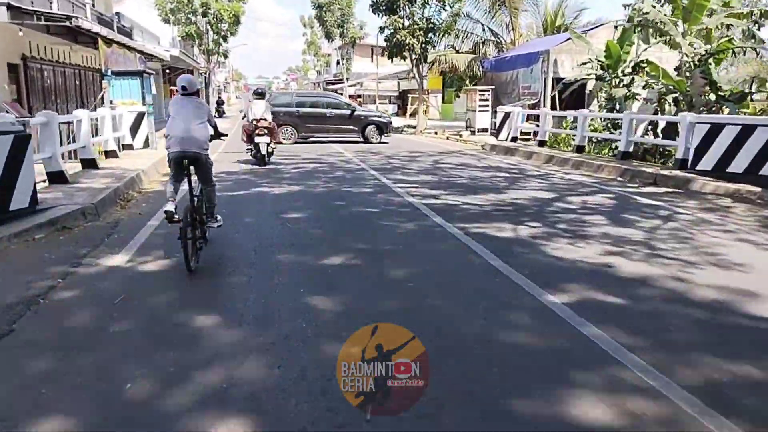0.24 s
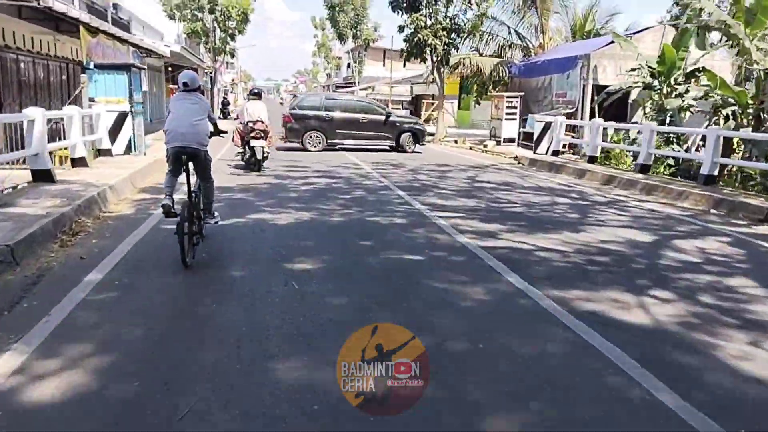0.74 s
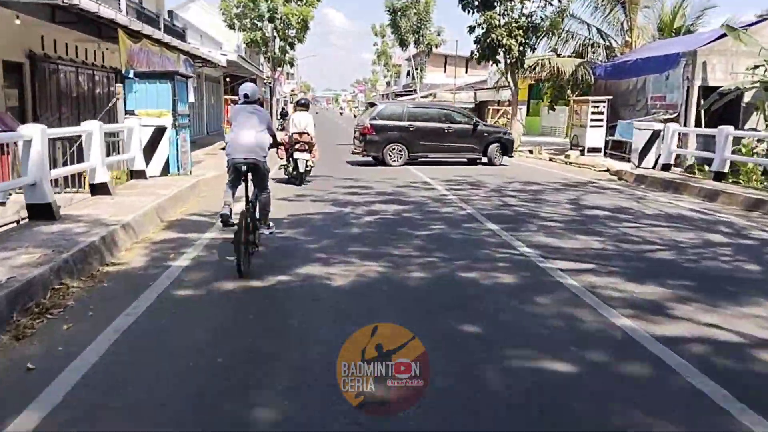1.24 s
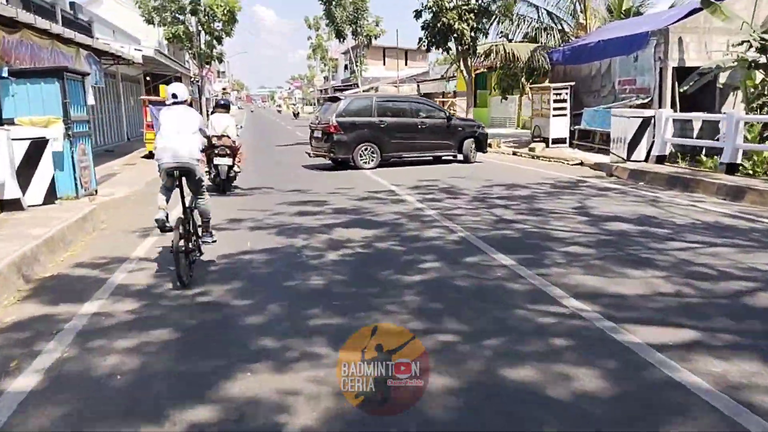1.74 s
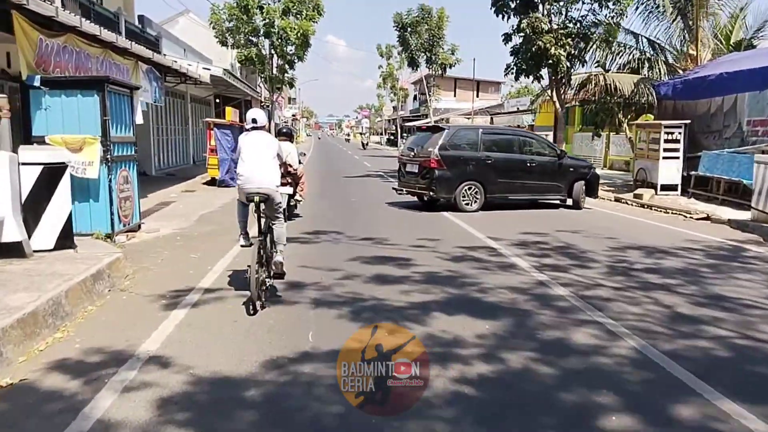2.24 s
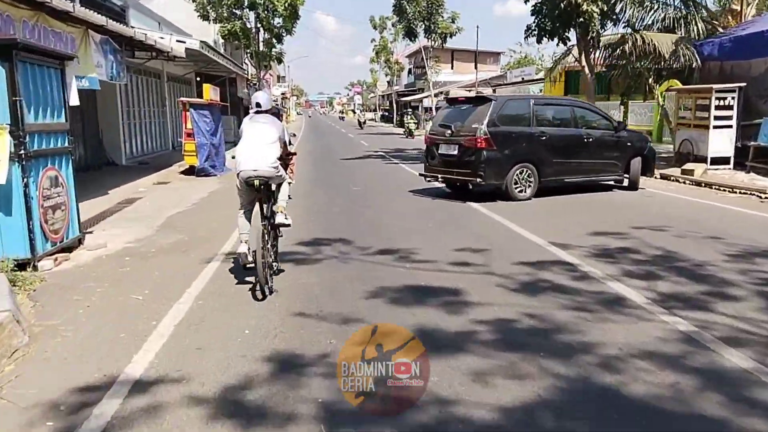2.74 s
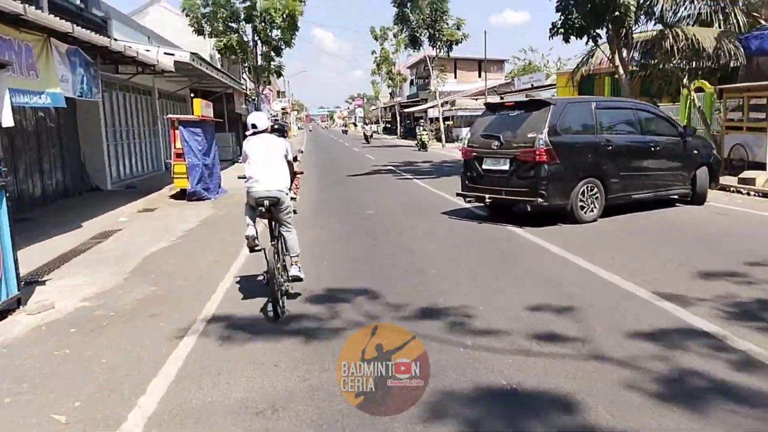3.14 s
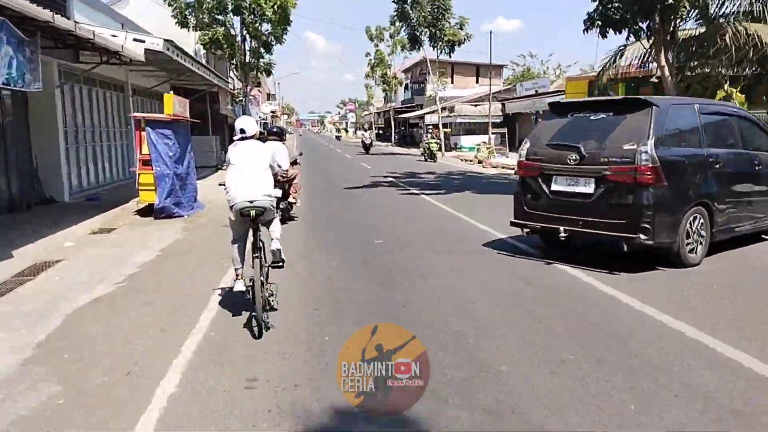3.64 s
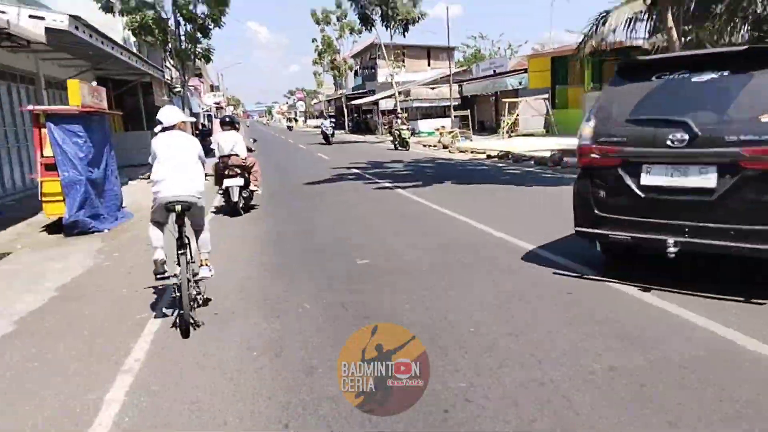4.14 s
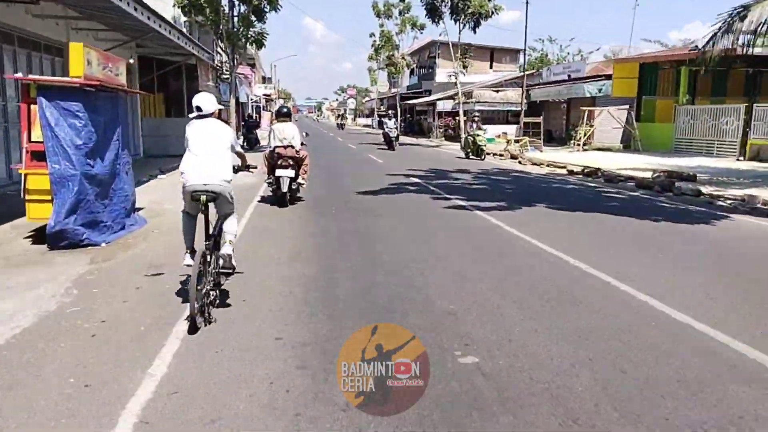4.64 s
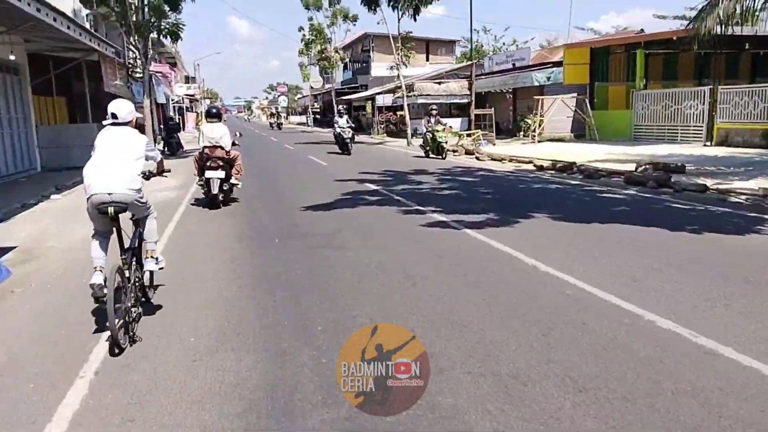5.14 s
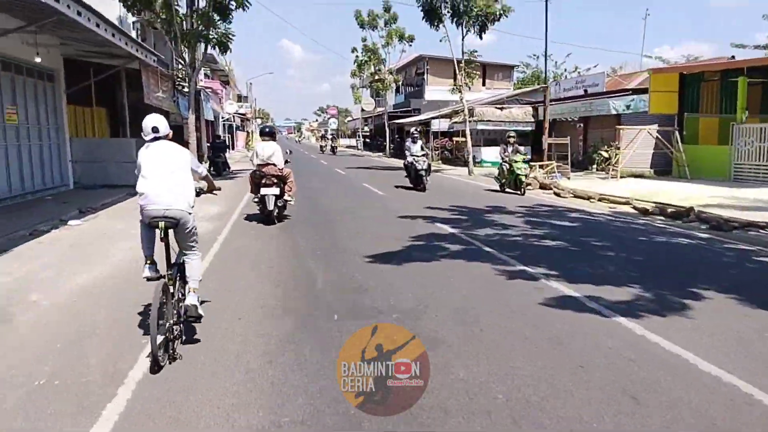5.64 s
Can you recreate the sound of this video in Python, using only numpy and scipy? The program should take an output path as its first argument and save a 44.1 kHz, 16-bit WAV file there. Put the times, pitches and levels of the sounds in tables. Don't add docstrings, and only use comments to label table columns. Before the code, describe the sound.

A motorbike whooshes past in buffeting wind, then a small bicycle bell is flicked seven times close by, ringing brightly over faint street traffic.

```python
import sys
import numpy as np
from scipy import signal
from scipy.io import wavfile
from scipy.ndimage import uniform_filter1d

SR = 44100
rng = np.random.default_rng(int(sys.argv[2]) if len(sys.argv) > 2 else 0)


def undo_db(level):
    steps = np.asarray(level, float) / 20
    return 10 ** steps


def store_wav(level_fs):
    pcm = np.round(np.clip(np.atleast_2d(level_fs), -1, 1) * 32767)
    wavfile.write(sys.argv[1], SR, pcm.T.astype(np.int16))


N = 260631


def evened(x):
    return x / np.sqrt(np.mean(x ** 2) + 1e-20)


def read(points, hz):
    f, value = np.transpose(points)
    return np.interp(np.log(hz + 1), np.log(f + 1), value, left=-90, right=-90)


def along(rows, column):
    rows = np.asarray(rows)
    return np.interp(np.arange(N) / SR, rows[:, 0], rows[:, column])


def add(mix, s, sound):
    part = mix[round(s * SR):][:len(sound)]
    part += sound[:len(part)]


def slow(hz):
    low_pass = signal.butter(2, hz, fs=SR, output="sos")
    return evened(signal.sosfiltfilt(low_pass, rng.standard_normal(N)))


def noise(colour, size, patch_db, patch_hz, patch_s):
    hop = size // 4
    frames, hz = N // hop + 5, np.fft.rfftfreq(size, 1 / SR)
    a, b, patches = rng.standard_normal((frames, len(hz), 3)).T
    patches = uniform_filter1d(patches, max(1, round(patch_hz * size / SR)), 0)
    patches = evened(uniform_filter1d(patches, max(1, round(patch_s * SR / hop)), 1))
    z = (a + 1j * b) * undo_db(read(colour, hz)[:, None] + patch_db * patches)
    return evened(signal.istft(z, nperseg=size, noverlap=size - hop)[1][:N])


def resonate(x, hz, width):
    turn = np.exp(2j * np.pi * np.cumsum(hz * np.ones(len(x))) / SR)
    r = np.exp(-np.pi * width / SR)
    return 2 * (turn * signal.lfilter([1 - r], [1, -r], x / turn)).real


def narrow(x, hz, width):
    return evened(resonate(resonate(x, hz, width), hz, width))


def band(x, order, edges_hz):
    return evened(signal.sosfilt(signal.butter(order, edges_hz, "band", fs=SR, output="sos"), x))


def steadied(x, size):
    return evened(x / (uniform_filter1d(x ** 2, size) + .02 * np.mean(x ** 2)) ** .22)


# (time [s], level [dB], share of road grit [dB])
MOTORBIKE = [
    (0, -51.5, -67),
    (.3, -46.5, -64),
    (.4, -40, -68),
    (.67, -38, -62.5),
    (.85, -47, -63.5),
    (1.0, -53.5, -68),
    (1.1, -59, -73),
    (1.3, -80.5, -93.5),
]
# (frequency [Hz], level [dB per Hz])
EXHAUST = [(290, -73.5), (500, -26), (728, -7.5), (794, -1.5), (1120, -1.5), (1220, 3), (1670, -4),
           (1980, -5.5), (2400, -14), (3340, -19.5), (5000, -22.5), (6500, -36.5), (11000, -120)]


def motorbike():
    wash = noise(EXHAUST, size=1024, patch_db=3, patch_hz=120, patch_s=0.06)
    gone = np.clip((1.5 - np.arange(N) / SR) / .3, 0, 1)
    return undo_db(along(MOTORBIKE, column=1) - 8.5) * wash * gone


# (time [s], level [dB])
BREEZE = [(0, -58), (.3, -49), (.7, -49), (1.05, -44), (1.4, -50), (1.75, -54), (2.1, -63), (2.8, -68),
          (3.15, -57), (3.55, -44), (3.85, -49), (4.2, -52), (4.55, -50), (4.9, -46), (5.25, -46),
          (5.6, -53), (5.91, -53)]
# (peak time [s], length [s], buffet level [dB], low flutter below it [dB], high flap below it [dB])
GUSTS = [(0.135, 0.046, -39, -38, -34), (0.35, 0.085, -34, -6, -19), (0.5, 0.075, -36, -11, -27),
         (0.763, 0.059, -37, -30, -37), (0.838, 0.05, -35, -19, -47), (0.929, 0.066, -35, -16, -41),
         (1.01, 0.078, -35, -10, -36), (1.149, 0.048, -33, -18, -37), (1.233, 0.05, -40, -13, -36),
         (1.319, 0.046, -40, -26, -36), (1.531, 0.095, -37, -25, -34), (1.602, 0.094, -42, -19, -31),
         (1.701, 0.105, -44, -20, -31), (1.881, 0.058, -47, -27, -22), (2.174, 0.059, -36, -19, -44),
         (2.252, 0.05, -44, -19, -5), (2.906, 0.044, -49, -20, -16), (3.065, 0.046, -42, -18, -10),
         (3.27, 0.091, -43, -14, -13), (3.446, 0.055, -31, -19, -27), (3.522, 0.053, -32, -12, -27),
         (3.755, 0.11, -38, -9, -13), (3.921, 0.044, -35, -28, -26), (3.98, 0.055, -40, -23, -27),
         (4.144, 0.043, -35, -16, -17), (4.349, 0.095, -42, -10, -22), (4.407, 0.063, -43, -19, -20),
         (4.495, 0.107, -42, -17, -14), (4.648, 0.097, -38, -7, -16), (4.78, 0.054, -33, -15, -21),
         (4.877, 0.086, -27, -7, -9), (5.01, 0.054, -43, -5, -13), (5.1, 0.055, -37, -15, -22),
         (5.175, 0.046, -32, -18, -22), (5.259, 0.06, -37, -9, -27), (5.361, 0.062, -36, -11, -11),
         (5.51, 0.064, -40, -22, -26), (5.561, 0.051, -40, -26, -32), (5.655, 0.085, -45, -8, -8),
         (5.811, 0.045, -44, -13, -16)]
GUST_HZ = [123, 142, 149, 126, 134, 143, 150, 144, 128, 120, 116, 119, 135, 111, 122, 112, 140, 151, 149,
           138, 137, 155, 141, 134, 131, 160, 142, 154, 137, 122, 141, 134, 142, 154, 126, 145, 123, 149,
           151, 149]
# (frequency [Hz], level [dB per Hz])
BUFFET = [(12, -70), (20, -44), (43, -32), (91, -2), (113, 0), (184, -4), (264, -23), (300, -31),
          (357, -26), (400, -24), (520, -54), (880, -120)]


def wind():
    t = np.arange(N) / SR
    lumps = undo_db(1.7 * slow(hz=18))
    low = noise(BUFFET, size=2048, patch_db=1.0, patch_hz=40, patch_s=0.013)
    pitch = np.interp(t, np.transpose(GUSTS)[0], GUST_HZ) + 6 * slow(hz=10)
    throb = steadied(resonate(low, pitch, 45), size=600)
    buffet = evened(lumps * (throb + .45 * low))
    flutter = noise([(190, -26.5), (225, -6), (290, -11), (350, -34)],
                    size=2048, patch_db=1.5, patch_hz=40, patch_s=0.044)
    flap = noise([(290, -45.0), (330, 3.5), (480, -3.5), (620, -18.5)],
                 size=2048, patch_db=1.0, patch_hz=60, patch_s=0.035)
    push = undo_db(along(BREEZE, column=1) + np.array([[0], [-27], [-34]]))
    for s, length, db, flutter_db, flap_db in GUSTS:
        length = 1.2 * length
        near = slice(max(round((s - length) * SR), 0), round((s + length) * SR))
        bump = np.cos(np.pi / 2 * (t[near] - s) / length) ** 3
        shape = abs(bump) ** [[.9], [.9], [1]]
        peak = undo_db(db - 3 + np.array([[0], [flutter_db], [flap_db]]))
        push[:, near] = np.hypot(push[:, near], peak * shape)
    push *= undo_db(-.5)
    port = signal.butter(2, [62, 235], "band", fs=SR, output="sos")
    out = undo_db(.7) * signal.sosfiltfilt(port, push[0] * buffet)
    out += push[1] * evened(lumps * steadied(flutter, size=1200))
    return out + push[2] * evened(lumps * steadied(flap, size=1000))


# (time [s], road roar level [dB], nearness of the closest tyres [dB])
STREET = [(0, -56, -64), (.35, -49, -55), (.8, -76, -58.5), (1.1, -62.5, -70), (1.4, -63, -75),
          (1.7, -62.5, -76.5), (2.5, -61.5, -76), (3.04, -59.5, -74.5), (3.2, -53, -72.5),
          (3.87, -57.5, -74), (4.22, -60.5, -64), (4.28, -51.5, -50), (4.6, -56, -69), (4.85, -64.5, -72.5),
          (5.05, -57, -65.5), (5.2, -55, -63.5), (5.45, -57, -65.5), (5.62, -56.5, -55), (5.91, -57, -58)]
# (frequency [Hz], level [dB per Hz])
ROAR = [(260, -17), (450, -9), (620, -0.5), (850, -7.5), (1150, 3.5), (1300, 3), (1500, -23.5), (1800, -44)]
# (frequency [Hz], level [dB per Hz])
WHINE = [(1300, -4.5), (1500, -4.5), (1650, 1), (1800, -2), (2100, -6), (2500, -22.5), (2900, -41),
         (3300, -13.5)]
# (frequency [Hz], level [dB per Hz])
GRIT = [(2300, -10), (2700, -2), (3300, 6), (3900, -3), (4400, -14), (5500, -21), (6500, -20)]
# (frequency [Hz], level [dB per Hz])
HISS = [(4800, -48), (5500, -17), (7200, -9.5), (8600, -6), (9700, -2.5), (11900, -12.5), (14900, -17),
        (15450, -14.5), (15600, -66.5)]


def street():
    roar = noise(ROAR, size=2048, patch_db=4.2, patch_hz=50, patch_s=.14)
    whine = noise(WHINE, size=2048, patch_db=4.6, patch_hz=50, patch_s=.14)
    grit = noise(GRIT, size=1024, patch_db=3.5, patch_hz=130, patch_s=0.14)
    hiss = noise(HISS, size=1024, patch_db=1.7, patch_hz=260, patch_s=.3)
    tyres_db = along(STREET, column=2)
    traffic = undo_db(along(STREET, column=1)) * roar + undo_db(tyres_db) * whine
    near_db = tyres_db + 60
    bike = undo_db(along(MOTORBIKE, column=2))
    grit_level = np.hypot(undo_db(-70.5 + 0.48 * near_db), bike)
    hiss_level = np.hypot(undo_db(-64 + 0.18 * near_db), undo_db(-0.5) * bike)
    return traffic + grit_level * grit + hiss_level * hiss


# (time [s], frequency [Hz])
GROUND_DIP = [(0, 740), (.25, 720), (.45, 560), (.75, 540), (.95, 800), (1.3, 800)]


def road_echo(x):
    depth = np.clip((1.15 - np.arange(N) / SR) / .5, 0, .85)
    return x - depth * resonate(x, along(GROUND_DIP, column=1), 260)


# (time [s], length [s], start pitch [Hz], end pitch [Hz], level [dB])
SQUEAKS = [(1.429, 0.21, 1215, 1227, -67), (1.683, .22, 670, 610, -61.5), (1.969, 0.032, 1204, 1280, -60.5),
           (2.05, 0.046, 1860, 1820, -64), (2.584, .11, 697, 604, -61), (2.95, 0.33, 381, 365.4, -54),
           (3.03, 0.071, 1270, 1194, -60.5), (3.034, 0.059, 1770, 1860, -69),
           (3.031, 0.076, 2370, 2460, -72), (3.366, 0.088, 725, 633, -55), (3.383, 0.29, 1700, 1620, -69),
           (3.74, 0.49, 1143, 1200, -55.5), (3.765, .12, 2490, 2400, -71.5), (3.746, 0.42, 1665, 1640, -69),
           (4.24, 0.058, 1895, 1740, -49), (4.407, 0.16, 476, 447, -57), (4.913, .18, 1245, 1220, -55),
           (4.944, 0.87, 1626, 1660, -57), (5.636, 0.023, 680, 660, -54.5),
           (1.085, 0.55, 3380, 3290, -73.5), (4.198, 0.85, 1673, 1598, -60), (.19, .08, 460, 400, -61),
           (.26, .2, 560, 620, -61), (4.71, .07, 690, 660, -57), (5.02, .08, 420, 450, -52),
           (1.915, .06, 3800, 3750, -80), (1.92, .06, 2950, 2900, -80), (2.71, .1, 1080, 1060, -64),
           (2.77, .07, 640, 600, -63), (2.96, .07, 720, 700, -61), (0, .26, 1130, 1100, -56),
           (2.229, .014, 900, 1200, -52), (1.875, 0.13, 525, 570, -66.5), (5.477, 0.22, 1440, 1395, -57.5),
           (5.582, 0.31, 370.4, 363, -56.5)]
# (time [s], length [s], level [dB])
RATTLE = (5.630, .026, -64)


def squeaks():
    out = np.zeros(N)
    for s, length, hz, end_hz, db in SQUEAKS:
        width = max(23 + 0.028 * hz, 5)
        chance = rng.standard_normal((SR, 2)) @ [1, 1j]
        low_pass = signal.butter(2, width / 2, fs=SR, output="sos")
        fuzz = signal.sosfilt(low_pass, chance)[-round(length * SR):]
        glide = np.exp(2j * np.pi * np.cumsum(np.linspace(hz, end_hz, len(fuzz))) / SR)
        core = 30 / width
        tone = evened(((fuzz / np.std(fuzz) + core) * glide).real)
        add(out, s, undo_db(db) * tone * signal.windows.tukey(len(tone), .7))
    s, length, db = RATTLE
    brush = evened(resonate(rng.standard_normal(SR), 6000, 7000))[:round(length * SR)]
    add(out, s, undo_db(db) * brush * np.hanning(len(brush)))
    return out


def gate(x):
    z = signal.stft(x, nperseg=1024, noverlap=768)[2]
    power = uniform_filter1d(uniform_filter1d(abs(z) ** 2, size=9, axis=1), size=3, axis=0)
    level_db = 10 * np.log10(power + 1e-16)
    over_db = level_db - np.percentile(level_db, 20, axis=1, keepdims=True)
    cut_db = -6 * np.clip(1.5 - over_db / 6, 0, 1.5)
    return signal.istft(z * undo_db(cut_db), nperseg=1024, noverlap=768)[1][:N]


# (fade time [s], fade level [dB], crest time [s], crest level [dB])
HUM = [(2.24, -54, 2.255, -46.6), (2.283, -79, 2.325, -58.5), (2.345, -75, 2.392, -52.4),
       (2.54, -71, 2.6, -44.5), (2.647, -63, 2.688, -42.6), (2.766, -53, 2.819, -45.1),
       (2.832, -64, 2.843, -47.0), (2.889, -66, 2.997, -37.5), (3.174, -61, 3.181, -52.1),
       (3.187, -60, 3.257, -41.9), (3.301, -55, 3.348, -44.2), (3.381, -61, 3.445, -44.3),
       (3.498, -67, 3.629, -48.3), (3.64, -56, 3.68, -49.7), (3.714, -63, 3.768, -42.9),
       (3.836, -73, 3.93, -45.6), (4.051, -70, 4.118, -49.9), (4.134, -55, 4.146, -46.0),
       (4.175, -61, 4.201, -54.7), (4.233, -60, 4.252, -52.6), (4.35, -86, 4.414, -49.9),
       (4.509, -65, 4.521, -60.0), (4.537, -75, 4.596, -57.7), (4.642, -80, 4.659, -64.2),
       (4.671, -70, 4.693, -59.3), (4.839, -88, 4.923, -65.2), (4.943, -76, 4.965, -71.4),
       (4.978, -88, 5.059, -62.9), (5.163, -88, 5.303, -62.7), (5.338, -76, 5.391, -57.7),
       (5.391, -58, 5.426, -47.7), (5.475, -64, 5.539, -36.3), (5.624, -55, 5.631, -50.4),
       (5.651, -60, 5.693, -41.7), (5.76, -64, 5.824, -45.9), (5.894, -56, 5.907, -46.8)]
# (time [s], pitch [Hz])
HUM_PITCH = [(2.26, 3441), (2.33, 3447), (2.5, 3443), (2.6, 3436), (2.73, 3437), (2.87, 3448), (3.05, 3441),
             (3.2, 3438), (3.35, 3448), (3.52, 3450), (3.63, 3435), (3.72, 3440), (3.85, 3432),
             (3.97, 3449), (4.1, 3447), (4.27, 3438), (4.45, 3442), (4.56, 3453), (4.7, 3442), (5.05, 3435),
             (5.4, 3440), (5.62, 3448), (5.9, 3444)]


def hum():
    null_s, null_db, crest_s, crest_db = np.transpose(HUM)
    t = np.arange(N) / SR
    turns_s = np.ravel([null_s, crest_s], "F")
    way = np.interp(t, turns_s, np.arange(2 * len(HUM)) % 2)
    beat = np.maximum(np.searchsorted(null_s, t) - 1, 0)
    low = undo_db(null_db)[np.minimum(np.searchsorted(crest_s, t), len(HUM) - 1)]
    level = low + (undo_db(crest_db)[beat] - low) * np.sin(np.pi / 2 * way)
    level = undo_db(-.8) * uniform_filter1d(level * (t > null_s[0]), size=120)
    echoes = noise([(3150, -30), (3300, -13), (3420, -9), (3500, -3), (3525, 0), (3560, -14), (3680, -30)],
                   size=4096, patch_db=3, patch_hz=20, patch_s=.06)
    echoes *= undo_db(-24) * uniform_filter1d(level, size=6000)
    hz = along(HUM_PITCH, column=1) + 2 * slow(hz=8)
    level *= undo_db(1 * slow(hz=30))
    return level * np.sqrt(2) * np.sin(2 * np.pi * np.cumsum(hz) / SR) + echoes


def around(t, db, t60, early_db, rise):
    return undo_db(db - 60 * np.maximum(t, 0) / t60 + early_db * (t < 0) + rise * np.minimum(t, 0))


def bright_ring(t, scrape, ring, rebound_db, t60, bounce):
    hz = 9452
    rebound, turns, damp_db, tail_db, _ = bounce
    after, before, late = np.maximum(t, 0), np.minimum(t, 0), np.maximum(t - rebound, 0)
    first = (t > 0) * undo_db(-150 * after - damp_db * np.maximum(t - ring, 0))
    second = (1 - np.exp(-late / .002)) * undo_db(rebound_db - 60 * late / t60 - 5000 * late ** 2)
    beat_hz, phase = 50 + 30 * rng.random(), 2 * np.pi * rng.random()
    second *= 1 + 0.22 * np.cos(2 * np.pi * beat_hz * late + phase)
    tone = first * np.sin(2 * np.pi * hz * t) + second * np.sin(2 * np.pi * (hz * t + turns))
    wind_up = (t < -.001) * undo_db(-17 + 850 * before - 12000 * before ** 2) * narrow(scrape, hz, 320)
    street_tail = undo_db(tail_db - 60 * after / .5) * narrow(scrape[::-1], 9660, 140)
    return tone + wind_up + street_tail * (t > 0)


# (frequency [Hz], level [dB], 60 dB decay [s])
SHELL = [(9095, -17, .035), (9280, -20, .04), (9640, -17, .06), (10450, -30, .05), (8550, -32, .04),
         (12800, -50, .04), (13600, -18, .006), (11800, -21, .006), (15200, -18, .005)]


def shell_ring(t, scrape, bracket_db):
    after = np.maximum(t, 0)
    out = undo_db(bracket_db - 60 * after / 0.13) * evened(resonate(scrape, 720, 790))
    for hz, db, t60 in SHELL:
        out += undo_db(db - 60 * after / t60) * np.sin(2 * np.pi * hz * t + 2 * np.pi * rng.random())
    return out * (t > 0)


def slow_rings(t, top_db, swell, side_db):
    after = np.maximum(t, 0)
    hump = (after / swell * np.exp(1 - after / swell)) ** 2
    tail = .45 * (1 - np.exp(-(after / swell) ** 2)) * undo_db(-60 * after / .3)
    top = undo_db(top_db) * (hump + tail) * np.sin(2 * np.pi * 14640 * t)
    side = undo_db(side_db - 60 * after / .9) * (1 - np.exp(-after / .04))
    return top + side * np.sin(2 * np.pi * 7148 * t)


SIZZLE_HZ = [7000, 15200]


def dry_noises(t, scrape, grit, tick_db, snap_db, sizzle_db, chatter_db, chatter_t60, echo_db):
    after, before = np.maximum(t, 0), np.minimum(t, 0)
    tick = (t > 0) * (np.exp(-after / .0005) + .14 * np.exp(-after / .006))
    tick += (t < 0) * .015 * np.exp(before / .004)
    out = undo_db(tick_db) * tick * grit
    out += around(t, sizzle_db + 6, .13, -7, 1100) * band(scrape, 4, SIZZLE_HZ)
    out += undo_db(-41) * np.cos(2 * np.pi * 2400 * t) * np.exp(-(t / .0002) ** 2)
    out += undo_db(snap_db) * np.cos(2 * np.pi * 13500 * t) * np.exp(-(t / .00009) ** 2)
    clicks = scrape * (rng.random(len(t)) < 1400 / SR)
    out += around(t, chatter_db, chatter_t60, -10, 1000) * narrow(clicks, 4550, 1100)
    return out + around(t, echo_db, .62, 8, 1200) * band(scrape[::-1], 2, [1800, 5200])


def blow(strike, clunk, bounce, snap_db, side_db, bracket_db, landing, grit):
    s, db, ring, rebound_db, t60 = strike
    clunk_db, clunk_hz, top_db, swell, tick_db = clunk
    rise, chatter_db, chatter_t60, echo_db = landing
    lead = .03
    t = np.arange(-lead, .6, 1 / SR)
    scrape = rng.standard_normal(len(t))
    grit = grit[round(s * SR) - len(t):][:len(t)]
    rings = bright_ring(t, scrape, ring, rebound_db, t60, bounce) + shell_ring(t, scrape, bracket_db)
    knock = np.sin(np.pi * np.clip(t / (2 * rise), 0, 1)) ** 2 * np.sin(2 * np.pi * clunk_hz * t)
    tones = undo_db(db) * rings + slow_rings(t, top_db, swell, side_db) + undo_db(clunk_db) * knock
    dry_part = dry_noises(t, scrape, grit, tick_db, snap_db, bounce[4], chatter_db, chatter_t60, echo_db)
    return s - lead, np.sqrt(2) * tones + dry_part


# (time [s], frequency [Hz], level [dB])
CLATTER = [(2.2462, 1160, -44), (2.2403, 1420, -41), (2.2461, 2180, -57), (2.2566, 2900, -57),
           (2.2398, 4260, -51), (2.2398, 4620, -49), (2.5659, 1300, -50), (2.5683, 1890, -52),
           (2.5684, 2150, -53), (2.5654, 2500, -52), (2.5654, 2910, -51), (2.5706, 4280, -50),
           (2.8554, 1440, -51), (2.8583, 2150, -51), (2.8554, 2910, -53), (2.8554, 3160, -50),
           (2.8569, 3980, -62), (2.8554, 4650, -53), (3.2292, 1060, -40), (3.2294, 1600, -47),
           (3.233, 2230, -50), (3.2292, 2910, -50), (3.2292, 3910, -51), (3.2292, 4680, -48),
           (3.638, 1420, -44), (3.6421, 2100, -52), (3.638, 2930, -47), (3.638, 3880, -51),
           (3.638, 4180, -53), (3.6388, 4670, -58), (4.13, 1280, -44), (4.1337, 2030, -52),
           (4.1358, 2660, -56), (4.13, 3740, -48), (4.1364, 4340, -53), (4.13, 5220, -52),
           (5.3907, 1060, -44), (5.3907, 1390, -46), (5.3907, 1640, -49), (5.3907, 1910, -50),
           (5.3907, 2690, -51), (5.3907, 3140, -48)]


def clatter():
    out, t = np.zeros(N), np.arange(0, .08, 1 / SR)
    for s, hz, db in CLATTER:
        level = undo_db(db + 3.5 - 60 * t / min(.05, 90 / hz)) * (1 - np.exp(-t / .0008))
        add(out, s, level * np.sin(2 * np.pi * hz * t))
    return out


# (time [s], level [dB], first ring [s], rebound level [dB], rebound decay [s])
BLOWS = [
    (2.2398, -24.5, .019, -9, .13),
    (2.5651, -23, .012, -12, .09),
    (2.8554, -24.5, .003, -6, .12),
    (3.2292, -22.5, .006, -6, .12),
    (3.6380, -23.5, .009, -15, .07),
    (4.1300, -25, .0105, -3, .12),
    (5.3907, -25, .009, -6, .11),
]
# (lever clunk level [dB], clunk pitch [Hz], top tone level [dB], its swell [s], tick level [dB])
CLUNKS = [(-39.5, 640, -51.5, 0.0054, -28), (-34, 677, -54.5, 0.026, -34), (-37, 514, -58.5, .016, -61),
          (-33, 730, -60, .012, -34.5), (-39, 630, -60, 0.0071, -24.5), (-37, 673, -47.5, 0.026, -28),
          (-41.5, 734, -56.5, .03, -29)]
# (wait [s], phase [turns], damping [dB/s], echo tail level [dB], spring sizzle level [dB])
REBOUNDS = [(.027, .45, 3200, -28, -57), (.016, .05, 2200, -35, -59), (.004, .05, 3100, -33, -63),
            (.010, .48, 4000, -35, -58), (.015, .4, 3300, -35, -57), (.0178, .45, 9000, -24, -55),
            (.014, .25, 3000, -30, -60)]
SNAP_DB = [-22, -26, -34, -27, -27, -23, -29]
SIDE_DB = [-64, -79, -79, -83, -83, -73, -81]
BRACKET_DB = [-26, -32, -40, -30, -34, -30, -26]
# (clunk rise [s], chatter level [dB], chatter decay [s], wall echo level [dB])
LANDINGS = [(.0075, -55, .15, -72), (.0058, -50, .05, -68), (.002, -61, .08, -72), (.0022, -56, .08, -68),
            (.003, -62, .08, -68), (.0055, -55, .14, -66), (.004, -63, .08, -67)]
# (frequency [Hz], level [dB per Hz])
TICK = [(180, -50), (300, -9), (3830, -61), (5430, -97), (6410, -46.5), (8220, 19), (9390, 29),
        (10700, -31), (13800, -31), (16000, -29)]


def bell():
    flat = [(f, d - 16 * np.exp(-((f - 9452) / 900) ** 2)) for f, d in TICK]
    grit = noise(flat, size=256, patch_db=3, patch_hz=900, patch_s=0)
    out = np.zeros(N)
    for row in zip(BLOWS, CLUNKS, REBOUNDS, SNAP_DB, SIDE_DB, BRACKET_DB, LANDINGS):
        add(out, *blow(*row, grit))
    return out + clatter()


HOLLOW_HZ = [2500, 3150, 3680, 5900]


def hollowed(x, loud):
    hz, t, z = signal.stft(x, SR, nperseg=1024, noverlap=768)
    below = (hz > HOLLOW_HZ[0]) & (hz < HOLLOW_HZ[1])
    above = (hz > HOLLOW_HZ[2]) & (hz < HOLLOW_HZ[3])
    loud_db = 10 * np.log10(abs(uniform_filter1d(loud ** 2, size=5000)) + 1e-12)
    loud_db = loud_db[np.minimum(t * SR, N - 1).astype(int)]
    power = uniform_filter1d(uniform_filter1d(abs(z) ** 2, size=7, axis=0), size=9, axis=1)
    band_db = 10 * np.log10(power + 1e-16)
    hidden = np.clip((loud_db - band_db - 54) / 3, 0, 1) * (below | above)[:, None]
    return signal.istft(z * undo_db(-34 * hidden), SR, nperseg=1024, noverlap=768)[1][:N]


def scene():
    ring = hum()
    air = wind()
    background = gate(road_echo(motorbike() + street()))
    return (ring + air + hollowed(bell() + background, ring) + squeaks())[None]


def roll_off(x):
    return signal.sosfilt(signal.butter(12, 16650, fs=SR, output="sos"), x)


def record(dry):
    cut = signal.firwin(255, 16400, window=("kaiser", 8), fs=SR)
    mix = signal.oaconvolve(dry, cut[None], "same")
    return roll_off(mix)


dry = scene()
out = record(dry)
store_wav(out)
```